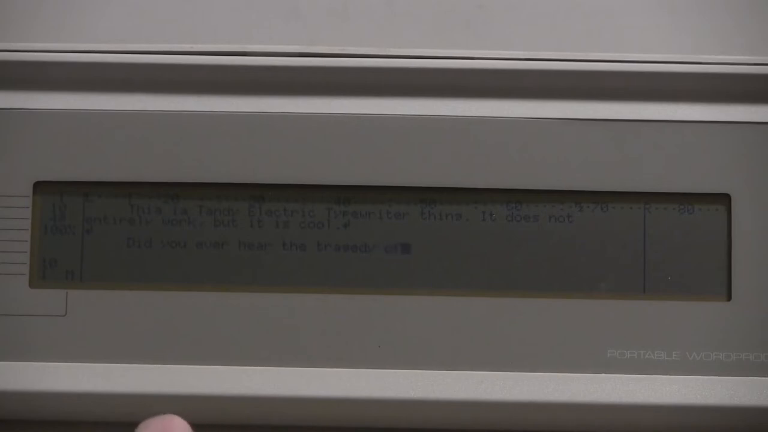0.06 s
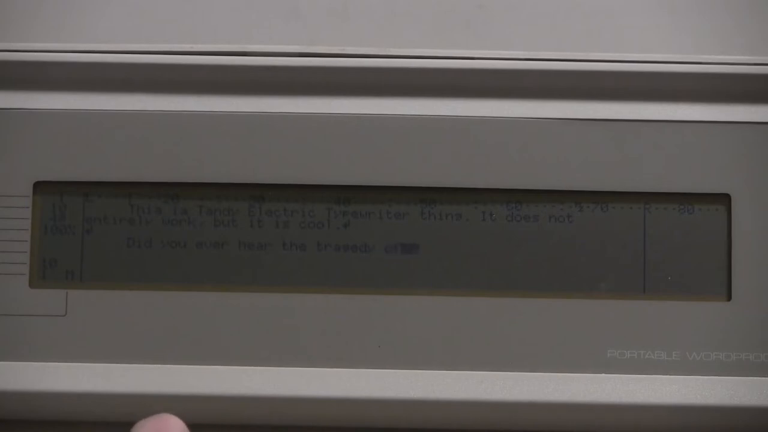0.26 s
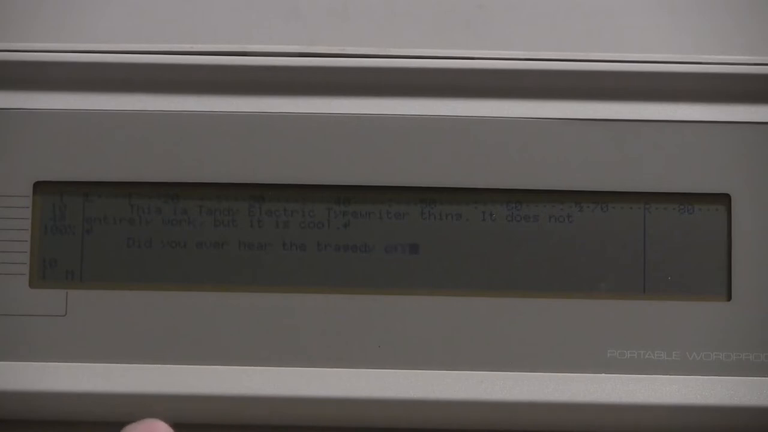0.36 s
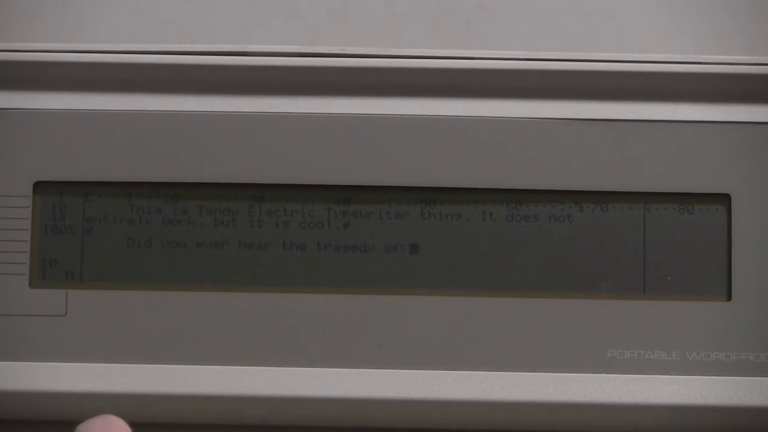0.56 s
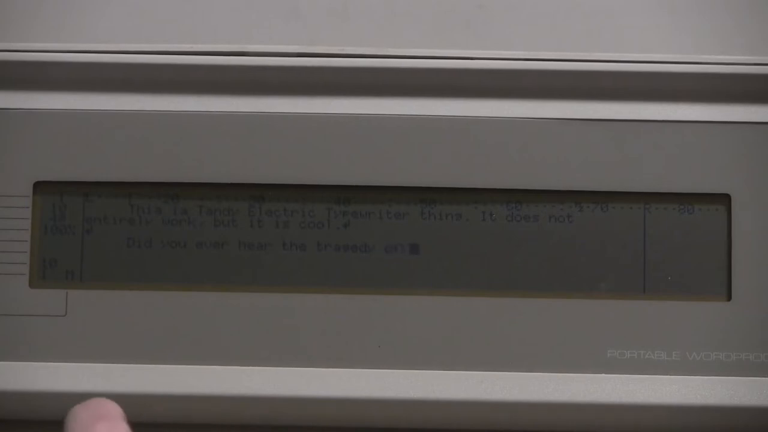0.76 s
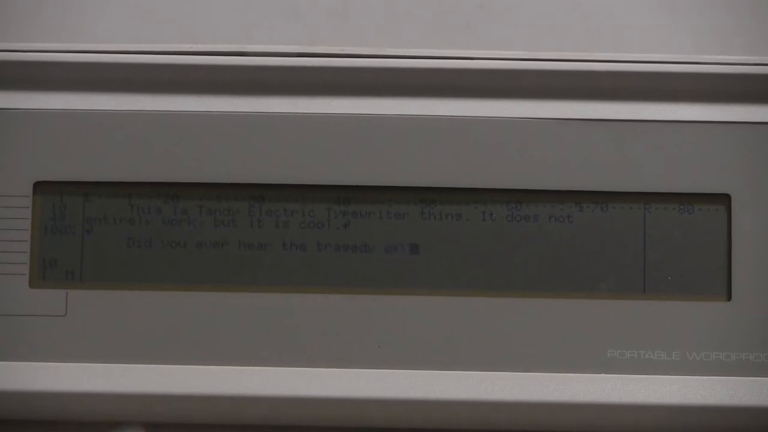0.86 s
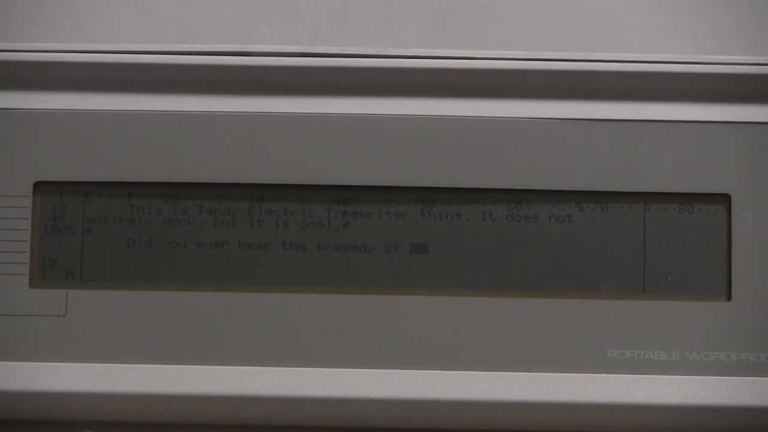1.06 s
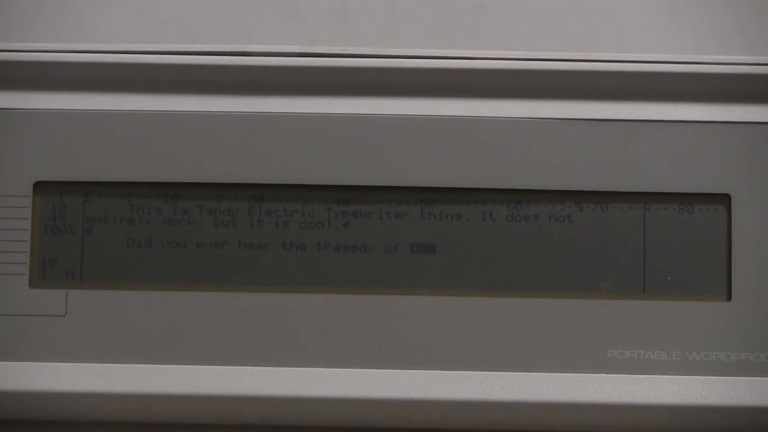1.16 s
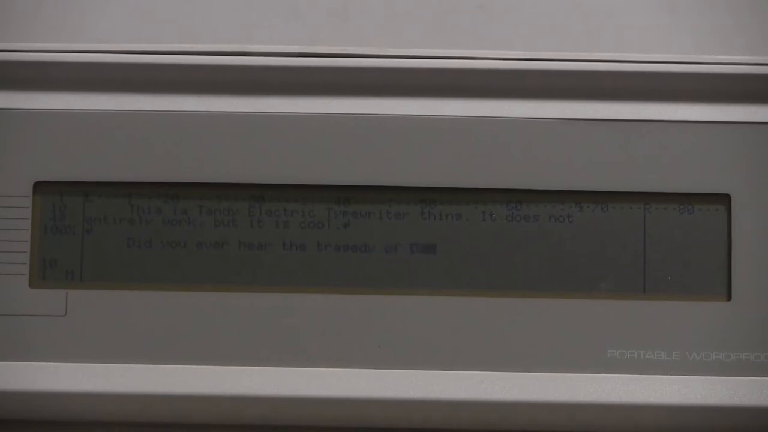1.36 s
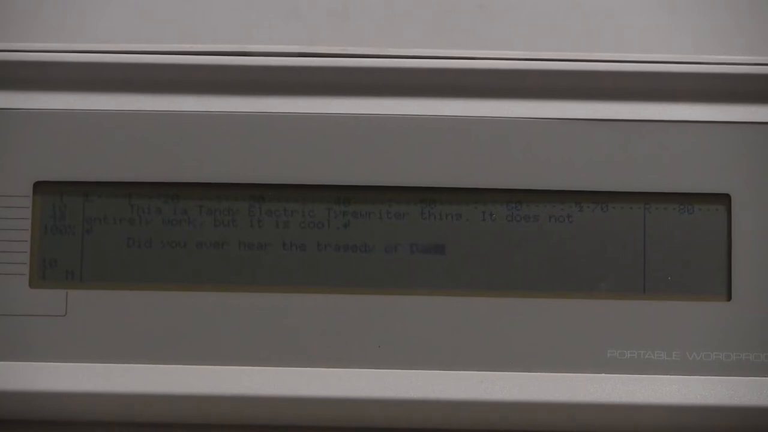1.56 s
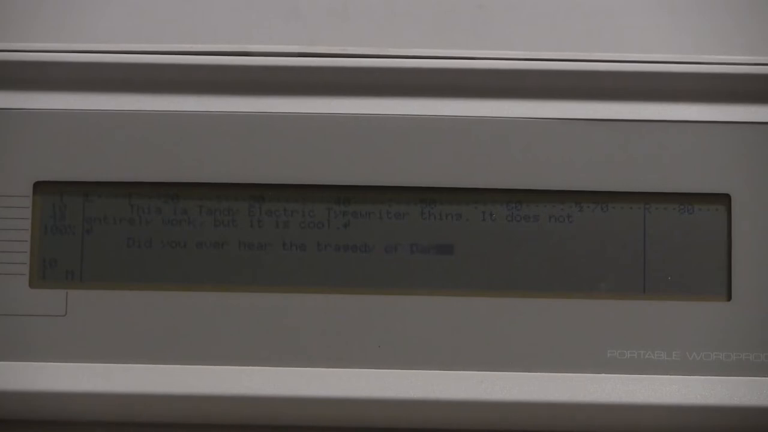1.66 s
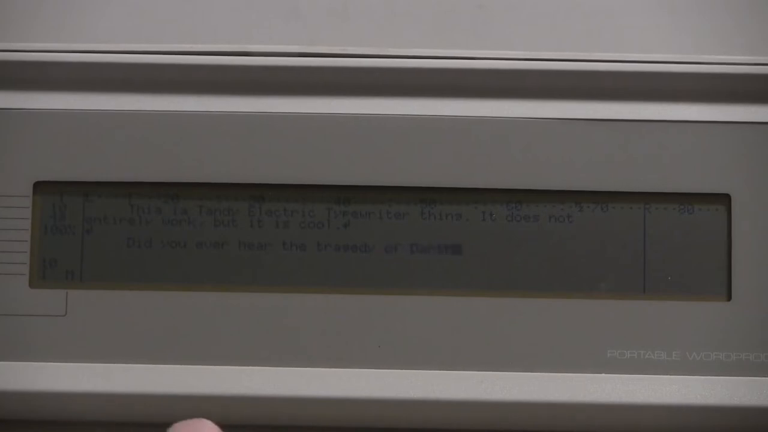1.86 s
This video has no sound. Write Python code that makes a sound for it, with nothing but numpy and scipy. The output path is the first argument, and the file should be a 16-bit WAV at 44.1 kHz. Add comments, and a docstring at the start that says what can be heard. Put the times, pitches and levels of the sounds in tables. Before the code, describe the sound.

Keys on a small electronic typewriter are tapped close to the microphone. Two louder clacks with a hollow thump and slight metal rattle come first, then lighter, uneven clicks, over quiet room noise and a faint high whine.

```python
"""Typing on a small electronic typewriter

Keys are tapped close to the microphone in a quiet room. Each contact is a burst of plastic chatter
with a hollow clack and a bright snap, and the case and the room ring after it. Hard strokes thump
the case, a wide key's metal bar rattles, and some strokes set a spring pinging.
Under it all lie room noise, a low hum and a faint electronic whine."""
import sys
import numpy as np
from scipy import signal
from scipy.fft import rfft, irfft, next_fast_len
from scipy.io import wavfile
from scipy.ndimage import uniform_filter1d

SR = 44100
rng = np.random.default_rng(int(sys.argv[2]) if len(sys.argv) > 2 else 0)


def wrap_up_sound(samples):
    """Save the sound to the file named by the first command line argument, as 16-bit audio."""
    columns = np.atleast_2d(samples).T
    # keep every value between -1 and 1, then stretch to whole-number steps
    tamed = np.clip(columns, -1, 1)
    steps = np.round(tamed * 32767).astype(np.int16)
    wavfile.write(sys.argv[1], SR, steps)


N = 83790

# A "colour" says how strong low and high pitches are. A "fade" is the time to drop by 60 dB.
# "Mid" is what both ears share; "side" is what differs between them.
# Colour of the room noise: pitch_hz, gain_db
ROOM_COLOUR = [(15, -42), (25, -18.5), (97, -7.5), (130, -6), (301, -12), (416, -15.5), (575, -12.5),
               (887, -18), (1290, -18), (1480, -18.5), (9320, -28.5), (13600, -34.5), (16000, -35)]
# The room noise's side compared with its mid: pitch_hz, gain_db
ROOM_SIDE = [(60, -20.5), (180, -6), (550, 0), (1650, -5.5), (4970, -4.5), (15000, -3.5)]
# Hum and whine tones: pitch_hz, level_db, wander_width_hz
HUM_AND_WHINE = [(55.5, -76.5, 5.2), (141, -67.5, 23.5), (189.3, -73, 3.8), (576, -70.5, 11.9),
                 (11500, -81, 9.3), (13184, -75.5, 5.9)]
# Key contacts: start_s, rise_s, fade_s, six band_db values (one for each of BANDS_HZ),
# clack_hz, clack_db, snap_hz, snap_db, tail_db
KEY_CONTACTS = [(0.2353, .0003, 0.03, -17, -16.5, -11, -7, -13.5, -16, 2540, 4, 7660, 13.5, 4.5),
                (0.2416, 0.0011, 0.021, -18, -18.5, -3.5, -8, -9, -11, 2820, 4.6, 8700, 11, 3),
                (0.2597, .0002, 0.011, -4.5, -3, 5.5, -1.5, -8.5, -30, 2930, 6, 6100, -1, -1),
                (.3402, 0.0027, .035, -36, -16, -9, -6, -13, -19, 2700, 3.3, 8100, 8, 2.5),
                (.3482, .0025, 0.026, -6.5, 2.5, 11, 6, 3.5, 3.5, 2770, 8.6, 8300, 7.5, -0.5),
                (0.6777, 0.00053, 0.036, -25, -27, -31, -29, -30, -43, 2700, 2, 5370, 12, 2.5),
                (.718, 0.00052, 0.0063, -23, -13.5, -14.5, -14, -15.5, -34, 2910, 15.6, 7550, 6.5, 1),
                (0.962, .0011, 0.024, -25, -14.5, -18, -15, -25, -28, 2500, 3.2, 7260, 8, 1.5),
                (.9719, 0.00056, 0.0033, -7, -10.5, -11, -7.5, -3, -30, 3250, 10.7, 7180, 15, 1.5),
                (1.0468, 0.00074, 0.0055, -20.5, -20, -18.5, -20.5, -22.5, -34, 3100, 7.1, 7100, 8, 3.5),
                (1.098, 0.00094, 0.0079, -19.5, -15, -16, -9.5, -14.5, -28, 2780, 12.4, 4670, 3, 1),
                (1.157, 0.00032, 0.024, -28, -33, -16, -30, -18, -46, 3060, 2, 7000, -1, 1),
                (1.1804, 0.00039, 0.0081, -12, -13, -11.5, -12.5, -10.5, -29, 3020, 4, 7500, 1, 0),
                (1.2582, .0004, 0.011, -23.5, -16.5, -12.5, -23, -26, -39, 2700, 7, 7000, -8, 0),
                (1.2631, 0.00044, 0.01, -23.5, -14.5, -16, -16.5, -15, -26, 2920, 11.5, 6660, 2, 2.5),
                (1.4157, 0.00063, 0.02, -21, -21, -19, -32, -23, -35, 2670, 6, 7000, 2, 3.5),
                (1.4252, 0.00098, 0.009, -5.5, -9, -4, -3, 2, -14.5, 2780, 7.6, 7340, 9, 0),
                (1.512, 0.00047, 0.014, -16.5, -16.5, -15, -19.5, -11, -30.5, 2920, 13.5, 7340, -26, 1),
                (1.603, 0.00083, .015, -35, -23, -17, -27, -27, -27, 2770, 1, 7000, 0, 1),
                (1.6156, 0.00042, 0.0055, -14.5, -8, -6.5, -5, -3.5, -12.5, 3140, 12.3, 8800, 6, 1),
                (1.6937, 0.00058, 0.011, -24, -17.5, -10, -15, -14, -23.5, 2800, 15, 6500, 5, 2.5),
                (1.7488, 0.00026, 0.0036, -15.5, -13, -14.5, -12, -9, -21, 2800, 1.8, 7600, 3.5, 1),
                (1.8274, 0.00058, .015, -24.5, -11.5, -10, -11, -15, -17, 2600, 2.9, 8100, 6, 2)]
# Where each contact's colour is set: pitch_hz
BANDS_HZ = [250, 900, 2300, 4600, 7600, 12500]
# How well the small case gives off each pitch: pitch_hz, gain_db
CASE_OUTPUT = [(20, -58), (60, -14), (115, -8), (150, -1.5), (13500, 0), (15000, -11), (16000, 3)]
# Resonances (favoured pitches) of a keycap: pitch_hz, width_hz, gain_db
KEYCAP_PEAKS = [(2050, 50, 6.5), (3800, 100, -2.5), (5530, 95, 0), (6960, 60, 5.5), (8170, 110, 5.5),
                (11500, 550, -1.5), (12900, 270, 4.5)]
# Resonances of the case: pitch_hz, width_hz, gain_db
CASE_PEAKS = [(195, 16, -1), (300, 10, 7), (492, 8.3, 7), (821, 74, 4.5), (1110, 21, 4.5), (1360, 16, -5),
              (1450, 13, -2.5), (2120, 230, 2.5), (3580, 250, -2.5), (8650, 180, 0.5), (10700, 670, 0)]
# Extra colour of the tail, the ringing of case and room after a click: pitch_hz, gain_db
TAIL_GAINS = [(40, 4), (100, -4), (150, 8.5), (300, 6.5), (900, 5.5), (2300, 0.5), (4600, -1), (7600, -4.5),
              (12500, -6.5)]
# How long the tail rings: pitch_hz, fade_s
TAIL_FADES = [(150, 0.63), (900, 0.24), (2400, 0.32), (5000, 0.32), (8000, 0.28), (14000, 0.21)]
# Hard strokes that thump the case: start_s, level_db
THUMP_HITS = [(.261, -41), (.352, -39), (.973, -56), (1.616, -47), (1.695, -69)]
# Low notes of the hollow case: pitch_hz, gain_db, fade_s
THUMP_NOTES = [(142, -0.4, 0.24), (190.5, -1.1, 0.22)]
# The wide key lands and returns: start_s, level_db
RATTLE_HITS = [(.261, -36), (.351, -38)]
# Notes of its metal bar: pitch_hz, gain_db, fade_s
RATTLE_NOTES = [(1554, -6.5, .26), (1650, -10, 0.49), (1833, -0.5, 0.21), (2077, -0.5, 0.2),
                (2224, 1, 0.18), (2315, -11, 0.3), (2545, 2.5, 0.11), (2730, -6.5, 0.17), (3490, -1, 0.14)]
# Pinging springs: start_s, pitch_hz, level_db, fade_s, damped_after_s
SPRING_PINGS = [(.35, 903, -50, 0.77, 0.53), (0.677, 1684, -50.5, 0.092, .1), (0.72, 950, -60.5, .4, 0.078),
                (0.974, 463.6, -49, 0.33, .1), (1.097, 821, -50, 0.26, 0.22), (1.157, 2020, -49, .2, .13),
                (1.426, 970, -46.5, 1, .08), (1.828, 941, -44.5, 0.29, .1)]
# How much louder the left microphone port is than the right: pitch_hz, difference_db
PORT_BALANCE = [(60, 0.5), (150, 0), (380, 0.0), (950, 0.0), (2380, -0.5), (5980, 1), (15000, -1)]


def amp(db):
    """Turn decibels into a number to multiply by."""
    return 10 ** (np.asarray(db) / 20)


def unit(x):
    """Scale a sound to an average (rms) level of 1."""
    return x / np.sqrt(np.mean(x ** 2) + 1e-20)


def along(points, hz):
    """Read between (pitch, value) points, with octaves evenly spaced."""
    pitches, values = np.transpose(points)
    return np.interp(np.log(hz + 1), np.log(pitches + 1), values)


def bump(hz, centre_hz, width_hz):
    """A resonance peak of height 1."""
    return 1 / (1 + ((hz - centre_hz) / width_hz) ** 2)


def coloured(x, db_of_hz):
    """Turn each pitch up or down by the given decibels."""
    size = 2 * next_fast_len(x.shape[-1])
    cepstrum = irfft(np.log(amp(db_of_hz(np.fft.rfftfreq(size, 1 / SR)))), size)
    # Fold it forward in time, so the filter rings only after a sound arrives.
    cepstrum[1:size // 2] *= 2
    cepstrum[size // 2 + 1:] = 0
    return irfft(rfft(x, size) * np.exp(rfft(cepstrum)), size)[..., :x.shape[-1]]


def evened(x, span_hz):
    """Make a burst equally strong at all pitches, keeping detail narrower than span_hz."""
    def levelling_db(hz):
        power = abs(rfft(x, 2 * (len(hz) - 1))) ** 2
        smooth_power = uniform_filter1d(power, max(1, int(span_hz / hz[1])))
        return -10 * np.log10(abs(smooth_power) + 1e-12)
    return coloured(x, levelling_db)


def stereo(mid, side):
    """Make left and right from mid and side."""
    return np.array([mid + side, mid - side])


def add(track, start_s, sound):
    """Mix a sound into the track at start_s."""
    part = track[..., round(start_s * SR):][..., :sound.shape[-1]]
    part += sound[..., :part.shape[-1]]


def room(noise_db=-60.5):
    """Steady room noise with a hum and a thin whine, each tone wandering a little in pitch."""
    mid, side = unit(coloured(rng.standard_normal((2, N)), lambda hz: along(ROOM_COLOUR, hz)))
    out = amp(noise_db) * stereo(mid, coloured(side, lambda hz: along(ROOM_SIDE, hz)))
    for hz, db, width_hz in HUM_AND_WHINE:
        drift_hz = width_hz / 2 * unit(uniform_filter1d(rng.standard_normal(N), size=1500))
        out += amp(db) * unit(np.sin(2 * np.pi * np.cumsum(hz + drift_hz) / SR))
    return out


def chatter(rise_s, fade_s, grain=0.13, hold_s=0.00059):
    """Plastic meets plastic: a grainy burst that swells, holds and dies within milliseconds."""
    t = np.arange(SR // 8) / SR
    swell = np.minimum(t / rise_s, 1) ** 0.5
    fade = amp(-60 * np.maximum(t - rise_s - hold_s, 0) / fade_s)
    noise, roughness = rng.standard_normal((2, len(t)))
    return evened(swell * fade * noise * np.exp(grain * roughness), span_hz=1450)


def ring_out(grain=0.67, echo_db=-1, echo_fade_s=0.1, rise_s=0.0033):
    """Quick echoes off the desk and case, and a wash of ringing whose low pitches last longest."""
    n = SR // 3
    t = np.arange(n) / SR
    hz, frame_s, spectrum = signal.stft(rng.standard_normal(n), SR, nperseg=256)
    fade = amp(-60 * frame_s / along(TAIL_FADES, hz)[:, None])
    wash = signal.istft(spectrum * fade, SR, nperseg=256)[1][:n]
    noise, roughness = rng.standard_normal((2, n))
    echoes = noise * np.exp(grain * roughness) * amp(echo_db - 60 * t / echo_fade_s)
    swell = 1 - np.exp(-(t / rise_s) ** 2)
    return evened((wash + echoes) * swell, span_hz=630)


def shell_colour(count=36, low_hz=693.4, high_hz=12080, height_db=4, sharpness=153):
    """A stroke wakes a random set of narrow resonances in the plastic shell."""
    centres = np.geomspace(low_hz, high_hz, 1000)[rng.integers(0, 1000, count)]
    def ripple_db(hz):
        peaks = sum(bump(hz, centre, centre / sharpness) for centre in centres)
        average = peaks[(hz > centres.min()) & (hz < centres.max())].mean()
        return height_db * (np.minimum(peaks, 1) - average)
    return ripple_db


def key_taps(click_side_db=-15, tail_side_db=-15.5):
    """Each key contact makes a click and a ringing tail, which share that contact's own colour."""
    out = np.zeros((2, N))
    for start_s, rise_s, fade_s, *band_db, clack_hz, clack_db, snap_hz, snap_db, tail_db in KEY_CONTACTS:
        shell = shell_colour()

        def contact_colour(hz, clack_share, snap_share, case_share):
            body = along(list(zip(BANDS_HZ, band_db)), hz) + along(CASE_OUTPUT, hz)
            clack = clack_db * bump(hz, clack_hz, width_hz=260)
            snap = snap_db * bump(hz, snap_hz, width_hz=390)
            case = sum(db * bump(hz, centre, width) for centre, width, db in CASE_PEAKS)
            return body + clack_share * clack + snap_share * snap + case_share * case

        def click_colour(hz):
            keycap = sum(db * bump(hz, centre, width) for centre, width, db in KEYCAP_PEAKS)
            return keycap + contact_colour(hz, clack_share=1, snap_share=1, case_share=0.08)

        def tail_colour(hz):
            ringing = along(TAIL_GAINS, hz) + shell(hz)
            return ringing + contact_colour(hz, clack_share=0.34, snap_share=0.43, case_share=1)

        click = stereo(chatter(rise_s, fade_s), amp(click_side_db) * chatter(rise_s, fade_s))
        tail = amp(tail_db) * stereo(ring_out(), amp(tail_side_db) * ring_out())
        add(out, start_s, coloured(click, click_colour))
        add(out, start_s + rise_s, coloured(tail, tail_colour))
    return out


def struck(hits, notes, rise_s, scatter_db, side_db):
    """A struck object rings with the same notes at every blow, at slightly different strengths."""
    out, t = np.zeros((2, N)), np.arange(SR // 2) / SR
    swell = 1 - np.exp(-t / rise_s)
    for start_s, hit_db in hits:
        for hz, note_db, fade_s in notes:
            start_db = hit_db + note_db - scatter_db * rng.standard_normal()
            level = swell * amp(start_db - 60 * t / fade_s)
            mid, side = level * np.sin(2 * np.pi * (hz * t + rng.random((2, 1))))
            add(out, start_s, stereo(mid, amp(side_db) * side))
    return out


def case_thumps():
    """Hard strokes make the hollow case ring with a low thump."""
    return struck(THUMP_HITS, THUMP_NOTES, rise_s=0.0095, scatter_db=2.2, side_db=-30)


def bar_rattle():
    """The wide key's metal bar rattles as the key lands and again as it returns."""
    return struck(RATTLE_HITS, RATTLE_NOTES, rise_s=0.003, scatter_db=0.4, side_db=-19)


def spring_pings(rise_s=0.0047, damped_fade_s=0.045):
    """Small springs ping faintly after some strokes, until the key damps them."""
    out, t = np.zeros(N), np.arange(SR // 2) / SR
    swell = 1 - np.exp(-t / rise_s)
    for start_s, hz, db, fade_s, damped_after_s in SPRING_PINGS:
        damping_db = 60 * np.maximum(t - damped_after_s, 0) / damped_fade_s
        level = swell * amp(db - 60 * t / fade_s - damping_db)
        add(out, start_s, level * np.sin(2 * np.pi * hz * t))
    return out


def microphone_ports(sound):
    """The microphone's two openings hear the keyboard at slightly different levels."""
    left = coloured(sound[0], lambda hz: along(PORT_BALANCE, hz) / 2)
    right = coloured(sound[1], lambda hz: -along(PORT_BALANCE, hz) / 2)
    return np.array([left, right])


def scene():
    """Typing over the quiet room."""
    typing = case_thumps() + bar_rattle() + key_taps() + spring_pings()
    return microphone_ports(typing) + room()


def record(dry, top_hz=15900):
    """Cut away every pitch above top_hz."""
    size = next_fast_len(N + SR // 2)
    kept = np.fft.rfftfreq(size, 1 / SR) < top_hz
    return irfft(rfft(dry, size) * kept, size)[:, :N]


dry = scene()
out = record(dry)
wrap_up_sound(out)
```